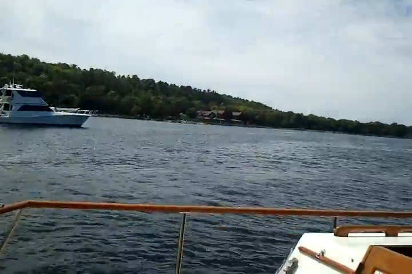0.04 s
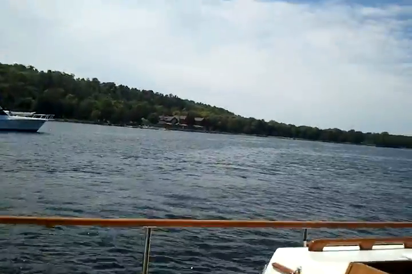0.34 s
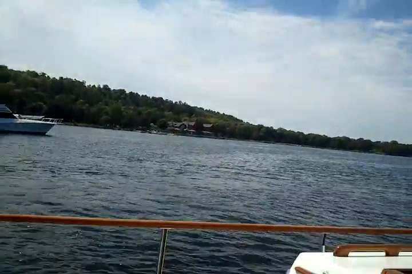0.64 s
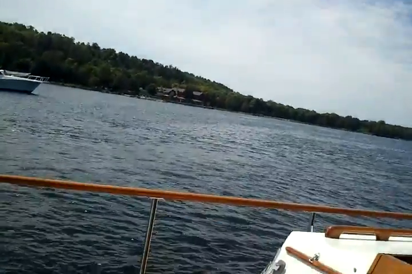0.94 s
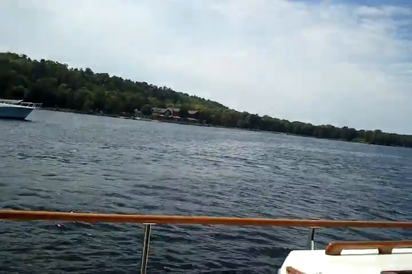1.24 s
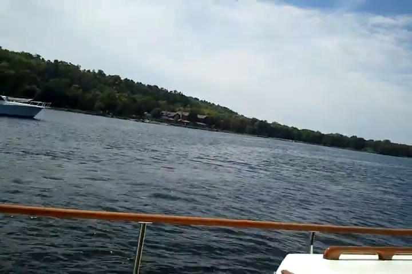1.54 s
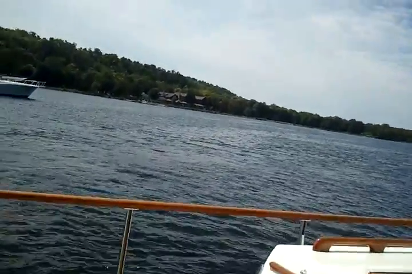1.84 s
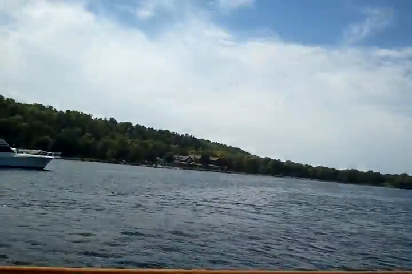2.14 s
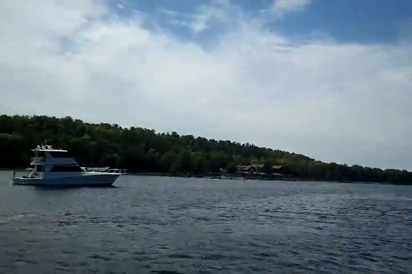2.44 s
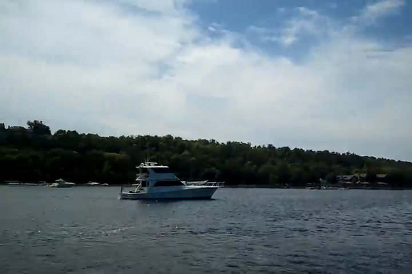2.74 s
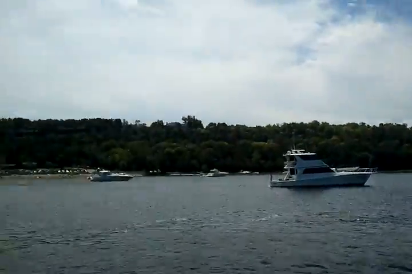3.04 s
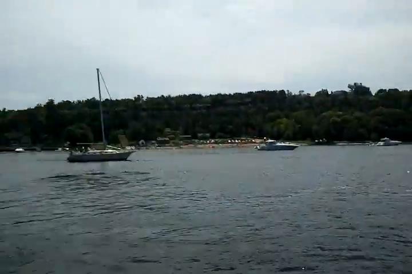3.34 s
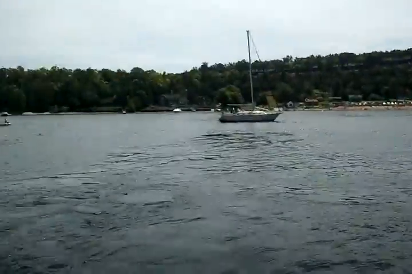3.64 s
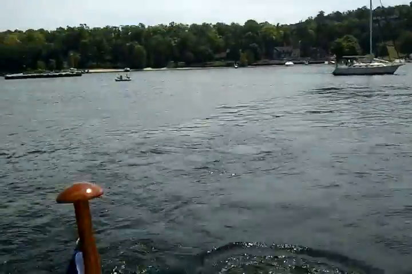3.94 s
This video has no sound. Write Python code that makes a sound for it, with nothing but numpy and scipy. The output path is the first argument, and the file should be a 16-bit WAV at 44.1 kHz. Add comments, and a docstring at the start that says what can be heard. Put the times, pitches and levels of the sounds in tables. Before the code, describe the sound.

A motor boat's engines drone low and steady while water washes alongside.

```python
"""On the deck of a motor cruiser crossing a harbour slowly, heard through one microphone. Two engines
run at slightly different speeds and beat against each other; their firings shake the hull and their gears
whine. Water washes and laps alongside, louder and brighter as the microphone turns to the churning wake.
Light gusts buffet the microphone, the deck takes a few dull bumps and a small fitting ticks.
The small recorder is close to overload."""
import sys
import numpy as np
from scipy import signal
from scipy.io import wavfile

SR = 44100
rng = np.random.default_rng(int(sys.argv[2]) if len(sys.argv) > 2 else 0)


def waveform_to_disk(signal):
    """Save audio, clipped to [-1, 1], as 16-bit WAV at the path in sys.argv[1]."""
    frames = np.transpose(np.atleast_2d(signal))
    scaled = np.clip(frames, -1, 1) * 32767
    samples = np.round(scaled).astype(np.int16)
    wavfile.write(sys.argv[1], SR, samples)


N = 176400
TIME = np.arange(N) / SR


def from_db(db):
    """Decibels to gain."""
    return 10 ** (np.asarray(db) / 20)


def rms_one(x):
    """Scale to rms 1."""
    return x / np.sqrt(np.mean(x ** 2) + 1e-20)


def in_time(rows, column=1):
    """One column of a timed table at every sample."""
    rows = np.array(rows)
    return np.interp(TIME, rows[:, 0], rows[:, column])


def at_hz(spectrum, hz):
    """Read a spectrum on a log-frequency axis."""
    freqs, levels = np.transpose(spectrum)
    return np.interp(np.log(hz), np.log(freqs), levels)


def drift(rate_hz):
    """Smooth random wander with spread 1."""
    step, settle = 40, 2000
    r = np.exp(-2 * np.pi * step * rate_hz / SR)
    slow = signal.lfilter([1], [1, -2 * r, r * r], rng.standard_normal(N // step + settle + 2))[settle:]
    return np.interp(np.arange(N) / step, np.arange(len(slow)), rms_one(slow))


def ring(clicks, hz, t60):
    """A unit click sets a decaying sine of height 1 ringing."""
    r, w = np.exp(-np.log(1000) / (t60 * SR)), 2 * np.pi * hz / SR
    return signal.lfilter([0, np.sin(w)], [1, -2 * r * np.cos(w), r * r], clicks + 1e-18)


def banded_noise(spectrum, flicker_db, flicker_hz):
    """Narrow noise bands shaped to a spectrum, each flickering on its own; rms 1."""
    edges = np.geomspace(16, 7600, 37)
    out, white = 0, rng.standard_normal((2, N + SR))
    for k, (low, high) in enumerate(zip(edges, edges[1:])):
        hz, flicker = np.sqrt(low * high), drift(flicker_hz)
        if spectrum[0][0] / 2 < hz < spectrum[-1][0] * 2:
            bandpass = signal.butter(2, [low, high], "band", fs=SR, output="sos")
            band = signal.sosfilt(bandpass, white[k % 2])[SR:]
            out = out + from_db(at_hz(spectrum, hz) + flicker_db * flicker) * band
    return rms_one(out)


def cycles(hz, wander):
    """Cycles completed at a slightly unsteady rate."""
    return np.cumsum(hz * (1 + wander * drift(2.74))) / SR


def tone(turns, level_db, waver_db):
    """One partial wavering about an rms level."""
    height = np.sqrt(2) * from_db(level_db + waver_db * drift(8.3))
    return height * np.sin(2 * np.pi * (turns + rng.random()))


def strike(s, peak_db, modes, t60, contact_s):
    """A blow followed by a short rattle rings a set of modes, neighbours in opposite phase."""
    age = np.maximum(TIME - s, 0)
    force = (age > 0) * np.exp(-age / contact_s) * rng.standard_normal(N) / np.sqrt(contact_s * SR)
    force[int(s * SR)] += 1
    out = sum((-1) ** k * from_db(db) * rms_one(ring(force, hz, t60)) for k, (hz, db) in enumerate(modes))
    return from_db(peak_db) * out / np.abs(out).max()


# First engine's firing tone, from the deck: t/s, level/dB
FIRST_LEVEL = [(0, -19), (.55, -12), (.75, -10.5), (1.0, -17), (2.25, -16.5), (2.4, -21), (2.65, -23),
               (3.0, -18.5), (4, -15)]
# Its deep throb, swelling and fading as a whole: t/s, level/dB
THROB_LEVEL = [(0, -38), (.55, -24), (.72, -18.5), (1.45, -17.5), (1.65, -20), (2.25, -16.5), (2.5, -33),
               (4, -27)]
# Tones of the throb: multiple of the firing rate, relative level/dB
THROB_TONES = [(.5, 1), (0.913, -5), (1.597, -6.5)]
# Second engine's firing rate: t/s, f/Hz
SECOND_RATE = [(0, 72.77), (.7, 71.68), (1.5, 71.82), (2.3, 73.0), (2.8, 73.54), (4, 73.7)]
# Its drone: t/s, firing tone level/dB, side tone level/dB
DRONE_LEVELS = [(0, -21, -33), (.48, -15.5, -32), (.72, -31, -36), (1.6, -31, -33), (1.9, -18, -24),
                (2.25, -24, -32), (2.45, -13, -31), (2.62, -13.5, -28), (2.8, -22, -22), (3.1, -22.5, -26),
                (3.75, -18, -25), (4, -20, -24)]
# Its octave: t/s, level/dB
OCTAVE_LEVEL = [(0, -25), (.5, -20.5), (.72, -26), (1.0, -24), (1.3, -22), (1.65, -19.5), (2.1, -20),
                (2.35, -29), (2.65, -17), (3.0, -17), (3.45, -17.5), (3.7, -30), (4, -23)]
# Its side tones: multiple of the firing rate, relative level/dB
SIDE_TONES = [(.5, 4), (1.58, -2.5), (2.27, -5.5), (3.52, -10.5)]

def engines(first, second):
    """Low exhaust tones of two engines beat together; first and second count their firings."""
    throb_db, side_db = in_time(THROB_LEVEL), in_time(DRONE_LEVELS, column=2)
    partials = [(first, in_time(FIRST_LEVEL))]
    partials += [(second, in_time(DRONE_LEVELS)), (2 * second, in_time(OCTAVE_LEVEL))]
    partials += [(k * first, throb_db + db) for k, db in THROB_TONES]
    partials += [(k * second, side_db + db) for k, db in SIDE_TONES]
    return sum(tone(turns, db, waver_db=2.5) for turns, db in partials)


# The six cylinders in firing order: relative level/dB
CYLINDERS = [8.5, 0, 0, 0, 0, -1.5]

def firings(turns):
    """A smooth pulse for each firing, with the strength of its cylinder; rms 1."""
    strength = from_db(CYLINDERS)[turns.astype(int) % len(CYLINDERS)]
    return rms_one(strength * np.sin(np.pi * turns) ** 4)


# Hull rumble underfoot: f/Hz, relative level/dB
HULL_SPECTRUM = [(20, -8), (45, -2), (70, -2), (110, -1), (170, -3.5), (235, -4), (300, -12), (400, -12),
                 (510, -17), (640, -15.5), (800, -29.5), (1200, -31.5), (2200, -38), (4000, -60)]
# Its rise and fall: t/s, level/dB
HULL_LEVEL = [(0, -18.5), (.7, -17), (1.3, -19), (1.8, -17.5), (2.3, -17), (2.6, -18), (3, -20), (3.5, -18),
              (4, -17.5)]

def hull(first, second):
    """The hull rumbles, shaken by the firings of both engines."""
    shake = rms_one(1 + 0.27 * (firings(first) + firings(second)))
    rumble = banded_noise(HULL_SPECTRUM, flicker_db=2, flicker_hz=8.3)
    return from_db(in_time(HULL_LEVEL)) * shake * rumble


# One gearbox's strongest tone, its third multiple: t/s, level/dB
WHINE_SWELLS = [(0, -30), (.11, -25), (.22, -35), (.33, -25.5), (.45, -36.5), (.56, -26), (.72, -30.5),
                (.88, -39.5), (1.3, -39), (1.42, -28.5), (1.56, -42.5), (2.2, -40.5), (3.0, -31.5),
                (3.2, -34.5), (3.55, -36.5), (4, -37.5)]
# The rest of its whine: multiple, level/dB
WHINE_TONES = [(2, -46), (4, -42.5), (5, -40.5), (6, -49.5), (7, -52.5), (8, -51), (9, -53)]
# Gain on those tones and the casing: t/s, level/dB
WHINE_GAIN = [(0, 9.5), (.11, 6), (.22, -1), (.35, 4.5), (.55, 2.5), (.72, -1.5), (.88, -3.5), (1.25, -5),
              (1.42, 3), (1.58, -4), (2.6, -5), (3.1, -0.5), (4, -0.5)]
# Ringing engine casing: f/Hz, relative level/dB
CASING_SPECTRUM = [(480, -9), (560, 2), (630, 0.5), (720, -11.5), (820, -34)]
# Thin tones of the other, slightly faster gearbox: multiple, level/dB
WHIRR_TONES = [(2, -42), (4, -50), (5, -47), (6, -43.5), (7, -50.5), (9, -49), (10, -51)]
# Its whirr: f/Hz, relative level/dB
WHIRR_SPECTRUM = [(1800, -15.5), (2050, -1.5), (2250, -4), (2450, -6.5), (2750, -17)]
# Gain on the thin tones and the whirr: t/s, level/dB
WHIRR_GAIN = [(0, -4.5), (.78, -1.5), (.93, 1.5), (1.2, 0.5), (1.45, 4.5), (1.65, -0.5), (1.82, 5.5),
              (2.1, 0), (2.8, 7.5), (3.4, -5), (4, -3.5)]

def gearboxes(first):
    """One gearbox whines over the ringing casing; the other's whirr buzzes with the firings."""
    whine, whirr = cycles(hz=237.3, wander=0.00096), cycles(hz=239.9, wander=0.002)
    whine_db, whirr_db = in_time(WHINE_GAIN), in_time(WHIRR_GAIN)
    partials = [(3 * whine, in_time(WHINE_SWELLS))]
    partials += [(k * whine, db + whine_db) for k, db in WHINE_TONES]
    partials += [(k * whirr, db + whirr_db) for k, db in WHIRR_TONES]
    jitter_cycles = 0.022
    tones = sum(tone(turns + jitter_cycles * drift(39), db, waver_db=1.1) for turns, db in partials)
    casing = from_db(whine_db - 34.5) * banded_noise(CASING_SPECTRUM, flicker_db=4.3, flicker_hz=5.3)
    buzz = rms_one(1 + 0.26 * firings(first)) * from_db(whirr_db - 40.5 + drift(15))
    return tones + casing + buzz * banded_noise(WHIRR_SPECTRUM, flicker_db=3, flicker_hz=45)


# Wash close alongside: f/Hz, relative level/dB
WASH_SPECTRUM = [(400, 2), (750, 6.5), (1200, 5), (1700, -1), (2250, -2), (3000, -2.5), (3800, -6.5),
                 (4800, -14.5), (5700, -12.5), (6500, -27.5), (7200, -40.5)]
# Its level between wavelets: t/s, level/dB
WASH_LEVEL = [(0, -31), (.13, -31.5), (.19, -35), (.25, -37), (.33, -30), (.68, -29), (.78, -35),
              (1.0, -31), (1.25, -35), (1.45, -32), (1.65, -33.5), (1.8, -31), (1.92, -31.5), (4, -32.5)]

def wash():
    """Water rushes along the hull and swells with each wavelet."""
    strength = from_db(in_time(WASH_LEVEL)) + laps()
    return strength * banded_noise(WASH_SPECTRUM, flicker_db=1.84, flicker_hz=12)


def drops(spectrum, per_s, ring_cycles):
    """Drops and small bubbles of random size, each ringing briefly; rms 1."""
    sizes = from_db(2 * np.minimum(rng.exponential(1, N), 4)) * rng.choice([-1, 1], N)
    clicks = sizes * (rng.random(N) < per_s / SR)
    pitches = np.geomspace(450, 6500, 24)
    pitch_index = rng.integers(0, len(pitches), N)
    out = 0
    for k, hz in enumerate(pitches):
        out += hz * from_db(at_hz(spectrum, hz)) * ring(clicks * (pitch_index == k), hz, ring_cycles / hz)
    return rms_one(out)


# The churning wake: f/Hz, relative level/dB
WAKE_SPECTRUM = [(200, -5.5), (400, 1), (900, 4.5), (1400, -1.5), (2300, -4), (3100, -11.5), (3800, -5),
                 (4900, -12), (5600, -7), (6400, -19.5), (7200, -34)]
# It comes up as the microphone turns towards it: t/s, level/dB
WAKE_LEVEL = [(0, -45.5), (1.65, -51), (2.0, -31.5), (2.2, -22.5), (2.35, -23.5), (2.46, -23), (2.53, -21),
              (2.78, -22), (2.95, -23.5), (3.06, -26.5), (3.2, -23.5), (3.45, -30.5), (3.7, -28.5),
              (3.78, -33), (4, -29.5)]

def wake():
    """Churned water, full of drops and bubbles."""
    churn = banded_noise(WAKE_SPECTRUM, flicker_db=1.97, flicker_hz=14)
    bubbles = from_db(-6) * drops(WAKE_SPECTRUM, per_s=1000, ring_cycles=15)
    return from_db(in_time(WAKE_LEVEL)) * rms_one(churn + bubbles)


# Foam beside the boat: f/Hz, relative level/dB
FOAM_SPECTRUM = [(2500, -1.5), (3700, 2), (4800, -4), (5600, -1.5), (6400, -6.5), (7200, -23.5)]

def foam():
    """Foam fizzes faintly and steadily."""
    return from_db(-46) * banded_noise(FOAM_SPECTRUM, flicker_db=1.5, flicker_hz=20)


def water(first, second):
    """Wash, wake and foam surge with the engines' beat and with each firing of the first."""
    beat = 1 + 0.17 * np.cos(2 * np.pi * (second - first))
    surge = rms_one(beat * (1 + 0.057 * firings(first)))
    return (wash() + wake() + foam()) * surge * from_db(0.5 * drift(20))


# Gusts right on the microphone: peak t/s, length/s, level/dB
GUSTS = [(.08, 0.32, -19), (1.847, 0.39, -19), (2.195, .2, -18.5), (3.95, 0.37, -18.5)]
# Their rumble: f/Hz, relative level/dB
GUST_SPECTRUM = [(60, -14), (85, 3.5), (110, 0.5), (150, -8.5), (250, -28)]

def wind():
    """Wind buffets the microphone in low, lumpy gusts that swell and fade."""
    strength = 0
    for s, length, db in GUSTS:
        strength += from_db(db) * np.cos(np.pi * np.clip((TIME - s) / length, -0.5, 0.5))
    return strength * banded_noise(GUST_SPECTRUM, flicker_db=1.5, flicker_hz=25)


# Bumps on the deck: t/s, peak level/dB, decay t60/s, treble tilt/(dB per octave)
BUMPS = [(.023, -3, .04, -1.5), (.146, -.5, .045, -4.5), (.214, 0, .014, -1), (.686, -8, .03, -2),
         (.701, 1.5, .02, 1.2), (2.425, -5, .07, -5), (2.438, 2.5, .03, .5)]
# Resonances of the deck: f/Hz, relative level/dB
DECK_MODES = [(125, 0), (205, -3), (290, -5), (385, -8), (480, -8), (610, -12.5), (900, -23)]

def bumps():
    """Dull blows ring the deck, the hardest ones brightest."""
    out = 0
    for s, peak_db, t60, tilt in BUMPS:
        modes = [(hz, db + tilt * np.log2(hz / DECK_MODES[0][0])) for hz, db in DECK_MODES]
        out += strike(s, peak_db, modes, t60, contact_s=0.0015)
    return out


# Wavelets lapping at the hull: peak t/s, level/dB
LAPS = [(.43, -31.5), (1.465, -30), (1.86, -28.5), (2.35, -28), (2.80, -28), (3.17, -26), (3.71, -29)]

def laps(rise_s=0.025, fall_s=0.0084):
    """Strength that wavelets add to the wash: each swells, then breaks off."""
    return sum(from_db(db) * np.exp(-np.maximum((s - TIME) / rise_s, (TIME - s) / fall_s)) for s, db in LAPS)


# Bright splashes standing out of the wake: t/s, peak level/dB, f/Hz
SPLASHES = [(2.570, -22, 5700), (2.805, -19.5, 5300), (2.950, -22, 5500)]

def splashes():
    """Each splash is a short spatter that rings at one pitch."""
    return sum(strike(s, db, [(hz, 0)], t60=0.014, contact_s=0.003) for s, db, hz in SPLASHES)


# A fitting on board and its bounce: t/s, peak level/dB
TICKS = [(3.370, -8.5), (3.375, -19)]
# Resonances of the fitting: f/Hz, relative level/dB
FITTING_MODES = [(3620, 2.5), (3900, 1), (4500, -8), (5200, -6), (6000, -13.5)]

def tick():
    """A small hard fitting clicks dryly and bounces once."""
    return sum(strike(s, db, FITTING_MODES, t60=0.008, contact_s=0.0004) for s, db in TICKS)


def scene():
    """Everything that reaches the microphone on deck, in mono."""
    first = cycles(hz=61.64, wander=0.004)
    second = cycles(in_time(SECOND_RATE), wander=0.004)
    machinery = engines(first, second) + hull(first, second) + gearboxes(first)
    return (machinery + water(first, second) + splashes() + wind() + bumps() + tick())[None]


def limiter(x, threshold_db, attack_s, release_db_per_s):
    """The recorder turns down quickly on loud peaks and recovers steadily."""
    over_db = np.maximum(20 * np.log10(np.abs(x) + 1e-9) - threshold_db, 0)
    fall_db = release_db_per_s * TIME
    held_db = np.maximum.accumulate(over_db + fall_db, axis=-1) - fall_db
    r = np.exp(-1 / (attack_s * SR))
    return x * from_db(-signal.lfilter([1 - r], [1, -r], held_db))


def record(dry):
    """The small recorder: a limiter, an off-centre stage that rounds the peaks, a steep treble cut."""
    offset, ceiling, hardness, cutoff_hz = -0.107, 0.71, 12, 7650
    x = limiter(dry, threshold_db=-3, attack_s=0.0028, release_db_per_s=57) + offset
    rounded = x / (1 + np.abs(x / ceiling) ** hardness) ** (1 / hardness)
    return signal.sosfilt(signal.cheby2(20, 70, cutoff_hz, fs=SR, output="sos"), rounded)


dry = scene()
out = record(dry)
waveform_to_disk(out)
```